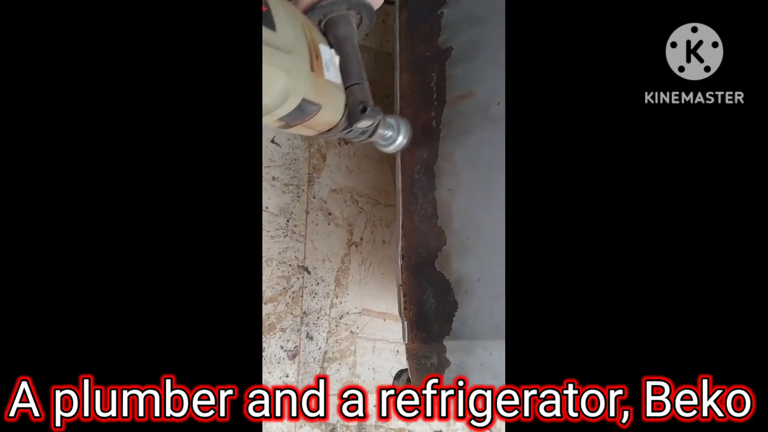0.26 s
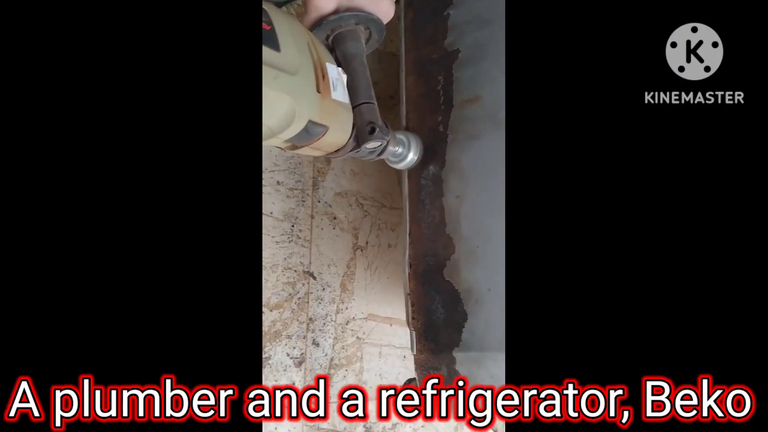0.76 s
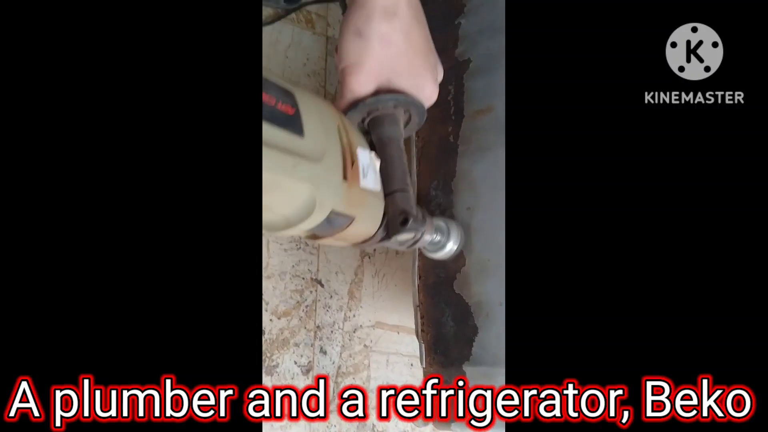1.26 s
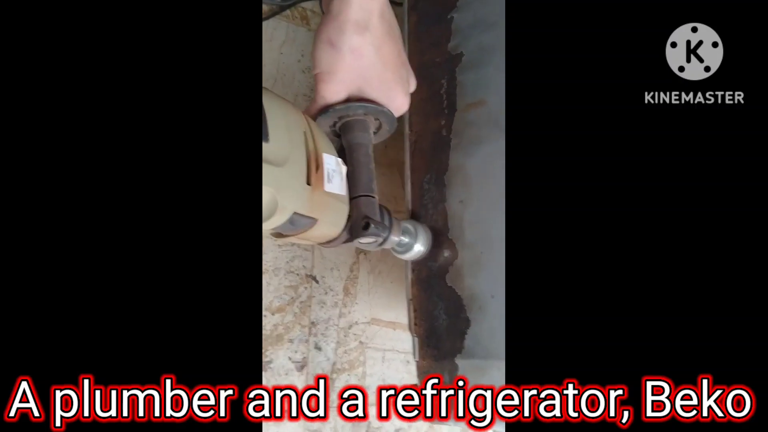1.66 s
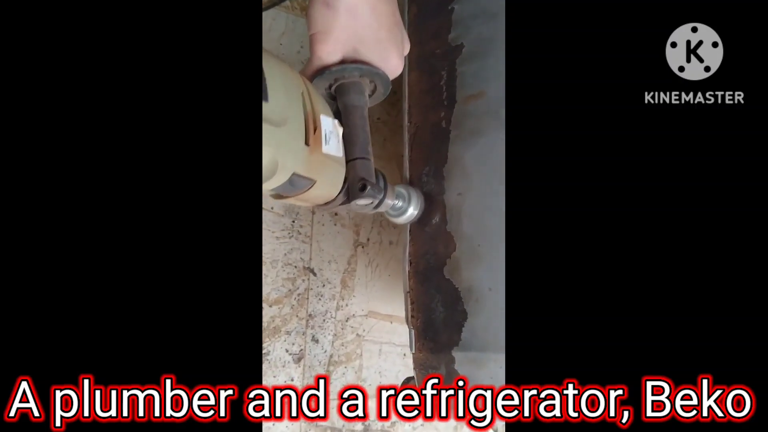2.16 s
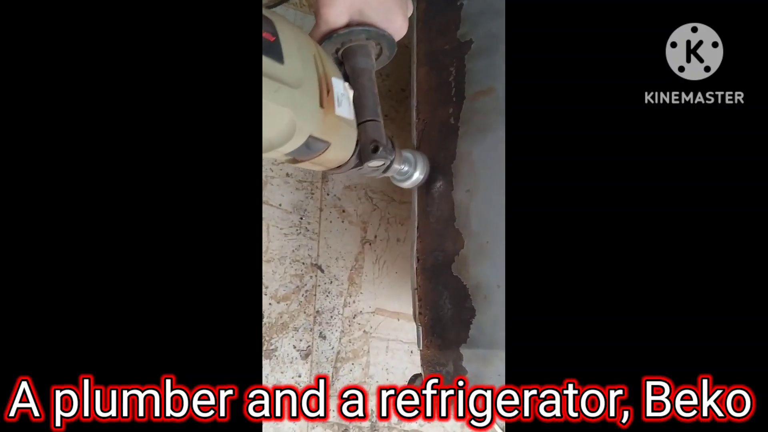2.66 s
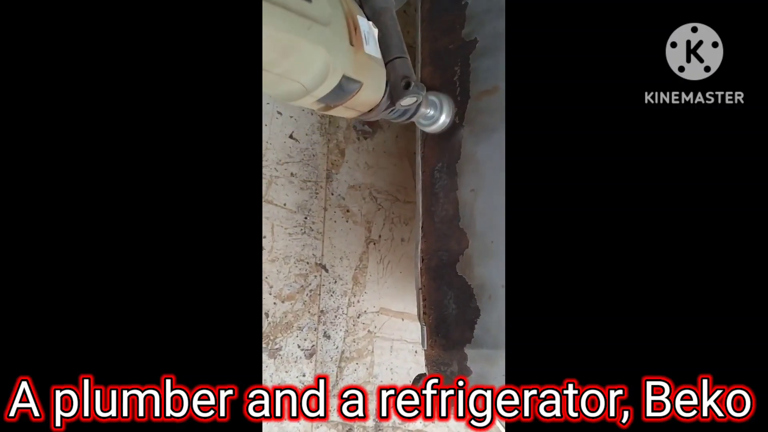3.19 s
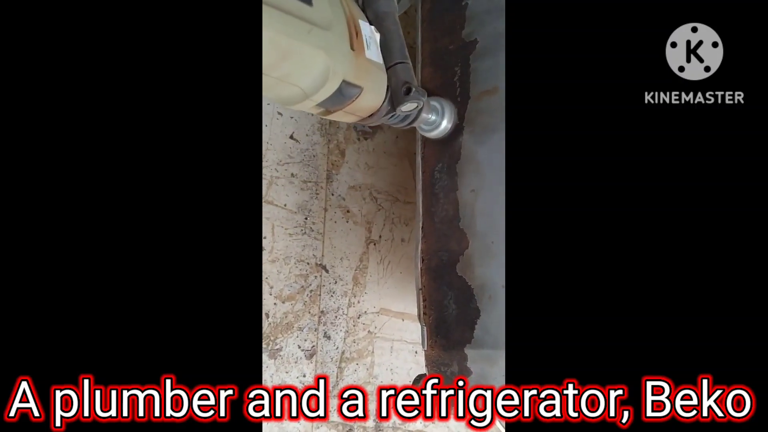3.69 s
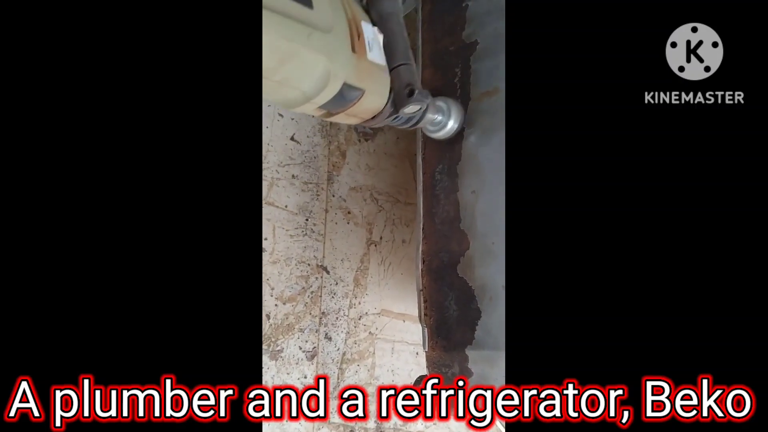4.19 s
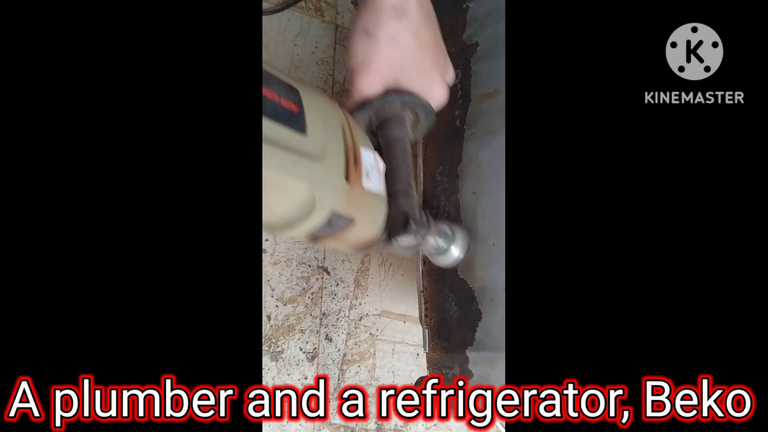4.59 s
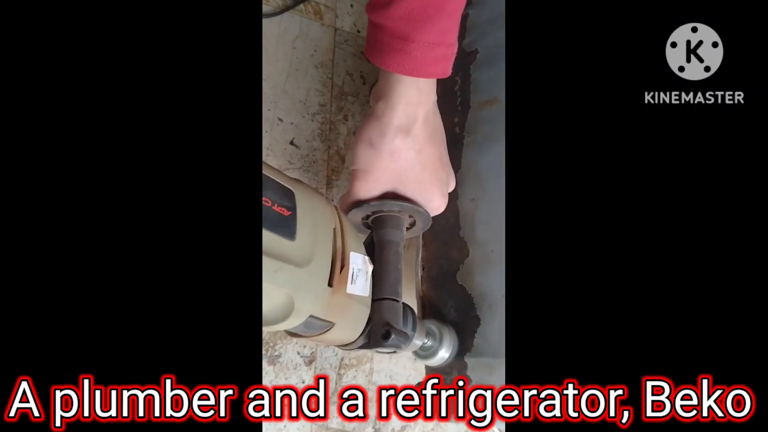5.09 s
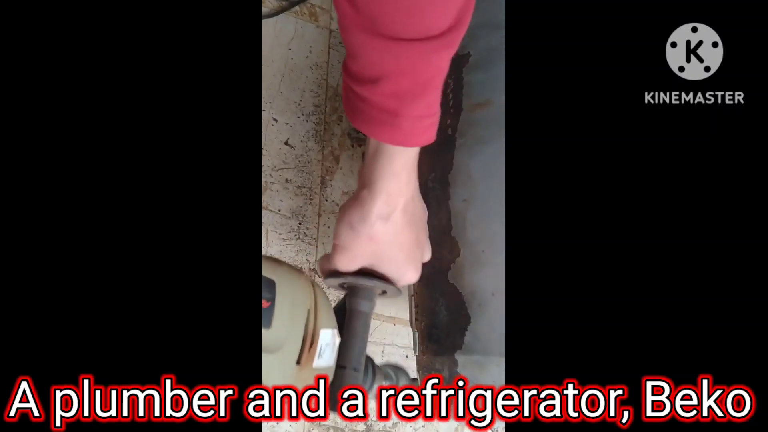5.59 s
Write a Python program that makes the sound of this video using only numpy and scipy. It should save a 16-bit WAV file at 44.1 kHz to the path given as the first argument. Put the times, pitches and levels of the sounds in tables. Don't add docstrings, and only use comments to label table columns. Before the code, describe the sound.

A corded drill whirs steadily up close, its wavering whine over a rough metallic scratching of a wire brush on rusty sheet metal.

```python
import sys
import numpy as np
from scipy import signal
from scipy.fft import rfft, irfft
from scipy.io import wavfile

SR = 44100
rng = np.random.default_rng(int(sys.argv[2]) if len(sys.argv) > 2 else 0)


def generate_wav(sig):
    pcm = np.round(np.clip(np.atleast_2d(sig).T, -1, 1) * 32767).astype(np.int16)
    wavfile.write(sys.argv[1], SR, pcm)


def magnitude_from_level(level_db):
    exponent = np.asarray(level_db, float) / 20
    return 10 ** exponent


N = 257984
MIC_CUT_HZ = 7965
WHINE_MEAN_DB = -23


def in_time(rows):
    seconds, *columns = np.transpose(rows)
    t = np.arange(N) / SR
    return [np.interp(t, seconds, column) for column in columns]


def rms_one(x):
    return x / np.sqrt(np.mean(x ** 2) + 1e-20)


def drift(rate_hz):
    every = 100
    pole = np.exp(-2 * np.pi * every * rate_hz / SR)
    noise = rng.standard_normal(N // every + 1002)
    slow = signal.lfilter([1], [1, -2 * pole, pole * pole], noise)[1000:]
    return np.interp(np.arange(N) / every, np.arange(len(slow)), rms_one(slow - slow.mean()))


def band(x, low_hz, high_hz):
    return signal.sosfilt(signal.butter(2, [low_hz, high_hz], "band", fs=SR, output="sos"), x)


def resonant(source, spectrum, low_hz, high_hz, count, shift_db, shift_rate, flicker_db):
    hz, db = np.transpose(spectrum)
    edges = np.geomspace(low_hz, high_hz, count + 1)
    out = np.zeros(N)
    for k in range(count):
        log_center = np.log(edges[k] * edges[k + 1]) / 2
        level_db = np.interp(log_center, np.log(hz), db)
        level_db = level_db + shift_db * drift(shift_rate) + flicker_db * drift(20)
        out += magnitude_from_level(level_db) * band(source[k % 2], edges[k], edges[k + 1])
    return rms_one(out)


# time [s], whine on the third multiple [dB].
WHINE = [(0, -19.5), (.3, -25.5), (.55, -19), (1.0, -23.5), (1.15, -20.5), (1.5, -24.5), (1.9, -24.5),
         (2.3, -22), (2.9, -23), (3.35, -19), (3.6, -21.5), (3.85, -17.5), (4.15, -22), (4.35, -18),
         (4.76, -22), (4.88, -26), (5.5, -30), (5.85, -28)]


def swing():
    return in_time(WHINE)[0] - WHINE_MEAN_DB


# time [s], level [dB].
BITE = [(0, 1.5), (.3, 0), (.75, .5), (1.5, 0), (2.0, 0), (2.5, -1), (2.9, 0.5), (3.25, 0), (3.5, .5),
        (4.25, 1), (4.75, -.5), (5.0, 0.2), (5.3, -0.5), (5.85, -1)]


def level(mean_db, whine_share, bite_share):
    return magnitude_from_level(mean_db + whine_share * swing() + bite_share * in_time(BITE)[0])


def workshop(x, count=10):
    t60_s, echo_db, first_return_s = .25, -11, .004
    age = np.arange(round(.3 * SR)) / SR
    place = np.linspace(0, count - 1, N)
    run_in = np.r_[x[-len(age):], x]
    out = x.copy()
    for k in range(count):
        tail = rng.standard_normal(len(age)) * magnitude_from_level(-60 * age / t60_s) * (age > first_return_s)
        tail *= magnitude_from_level(echo_db) / np.sqrt(np.sum(tail ** 2))
        echo = signal.fftconvolve(run_in, tail)[len(age):len(age) + N]
        out += np.cos(np.pi / 2 * np.clip(place - k, -1, 1)) * echo
    return out / np.sqrt(1 + magnitude_from_level(2 * echo_db))


# frequency [Hz], density [dB per Hz].
FIZZ = [(8000, 2), (9000, -0.5), (10000, -3.5), (11000, -4.5), (12500, -3), (13500, -1), (15600, -2)]


def microphone_fizz():
    noise = rng.standard_normal((2, N))
    fizz = resonant(noise, FIZZ, 7770, 16100, count=16, shift_db=-1.5, shift_rate=1.3, flicker_db=-0.2)
    return magnitude_from_level(-50.5) * workshop(fizz)


# middle [s], lowest frequency [Hz].
PUFFS = [(1.115, 4450), (1.138, 5000), (2.273, 5000), (3.9, 6200), (4.549, 5550), (4.688, 5300),
         (5.292, 4200), (5.292, 8000), (5.827, 4000), (1.115, 9200), (1.138, 13400), (1.553, 13700),
         (2.064, 10950), (2.18, 9560), (2.18, 12320), (2.296, 8870), (2.296, 11650), (3.9, 10250),
         (4.27, 9560), (4.549, 8870), (4.781, 13700), (5.617, 8870), (5.827, 9200)]


def noise_puffs():
    half, width_hz = 1024, 1400
    side = np.zeros(N + 2 * half)
    window = np.hanning(2 * half) ** 4
    hz = np.fft.rfftfreq(2 * half, 1 / SR)
    for middle_s, low_hz in PUFFS:
        spectrum = rfft(rng.standard_normal(2 * half))
        noise = irfft(spectrum * (hz > low_hz) * (hz < low_hz + width_hz))
        puff_db = -33 if low_hz < MIC_CUT_HZ else -58
        at = round(middle_s * SR) - half
        side[at:at + 2 * half] += magnitude_from_level(puff_db) * window * rms_one(noise)
    return side[:N] * [[1], [-1]]


# frequency [Hz], density [dB per Hz].
RUMBLE = [(15, -72), (25, -30.5), (43, -55), (97, -10.5), (144, -7.5), (253, -3.5), (386, -7), (444, -6),
          (503, -7.5), (857, -1.5), (1050, -1.5), (1360, -36), (2310, -120)]
# frequency [Hz], density [dB per Hz].
HISS = [(2410, -26.5), (4100, -9), (6360, -5), (7020, -4.5), (7400, -2), (7900, -10.5), (10300, -35),
        (17400, -120)]


def fan():
    air = rng.standard_normal((2, N))
    rumble = resonant(air, RUMBLE, 24.6, 1054, count=22, shift_db=-0.2, shift_rate=1.1, flicker_db=1.0)
    hiss = resonant(air, HISS, 4010, 8360, count=26, shift_db=1.1, shift_rate=0.84, flicker_db=0.86)
    rumble *= level(mean_db=-26.5, whine_share=-0.11, bite_share=.1)
    hiss *= level(mean_db=-29.5, whine_share=-0.11, bite_share=.1)
    return rumble + hiss


def bristles(per_s, spread_db):
    size_db = spread_db * np.minimum(rng.exponential(1, (2, N)), 4)
    strikes = magnitude_from_level(size_db) * rng.choice([-1, 1], (2, N))
    return strikes * (rng.random((2, N)) < per_s / SR)


# frequency [Hz], density [dB per Hz].
RING = [(590, -44), (1000, -27), (1070, -15), (1320, 1), (1380, -7), (1430, -2), (1520, -1.5), (1670, -6),
        (1900, -9.5), (2470, -39), (4180, -120)]
# frequency [Hz], density [dB per Hz].
SCRATCH = [(1900, 1.5), (2300, -3), (2800, -3.5), (3200, -8), (3600, -12), (3850, -12), (4000, -27),
           (4200, -30)]


def brush():
    tips = bristles(per_s=14000, spread_db=2.5)
    ring = resonant(tips, RING, 1003.5, 1896, count=12, shift_db=-0.7, shift_rate=2.3, flicker_db=0.53)
    scratch = resonant(tips, SCRATCH, 1879, 4210, count=20, shift_db=-0.55, shift_rate=0.6, flicker_db=0.72)
    ring = ring + (magnitude_from_level(.3 * swing()) - 1) * band(ring, 1160, 1470)
    ring *= level(mean_db=-17, whine_share=0.057, bite_share=1.2)
    scratch *= level(mean_db=-21.5, whine_share=-0.058, bite_share=0.88)
    return ring + scratch


# time [s], speed [turns per s].
SPEED = [(0, 445.5), (.4, 447.1), (.8, 450), (1.05, 449.6), (1.25, 451.4), (1.65, 456.5), (1.85, 455.2),
         (2.4, 445.6), (2.8, 441.6), (3.0, 441.7), (3.38, 446.6), (3.65, 446.2), (4.0, 447.4),
         (4.38, 451.1), (4.7, 451.2), (5.0, 452.3), (5.62, 452.5), (5.85, 454.8)]
# multiple of the turn, level at mean whine [dB],
# share of the whine's swing.
ORDERS = [(.55, -51, .5), (1, -38.5, -.2), (1.9, -44.5, 0), (2, -56, 0), (4, -41, .8), (5, -44, 1),
          (6, -46, .3), (8, -53, 1), (12, -57, 1), (24, -53, .6)]
# multiple of the turn, middle [s], spread [s], added level [dB].
SWELLS = [(1, 1.6, .17, -43), (1, 2.4, .15, -48), (1, 5.15, .45, -42), (2, .1, .15, -45), (2, .85, .3, -41),
          (2, 1.45, .25, -43), (2, 2.0, .25, -37), (2, 2.5, .2, -44), (2, 3.0, .18, -42),
          (2, 4.75, .2, -42), (2, 5.3, .33, -36.5), (6, 2.9, .5, -46), (16, 2.6, .4, -41),
          (24, 2.8, .35, -46), (8, 2.5, .2, -50), (4, 3.8, .5, -43), (12.5, 5.25, .2, -49),
          (17, 5.25, .25, -50), (15, .9, .4, -51), (15, 5.7, .2, -48), (16, 5.5, .3, -52)]


def motor():
    t = np.arange(N) / SR
    turns, = in_time(SPEED)
    angle = 2 * np.pi * np.cumsum(turns + .45 * drift(7)) / SR
    heights = {3: magnitude_from_level(WHINE_MEAN_DB + swing())}
    for multiple, level_db, share in ORDERS:
        heights[multiple] = magnitude_from_level(level_db + share * swing())
    for multiple, middle, spread, level_db in SWELLS:
        swell = magnitude_from_level(level_db) * np.exp(-.5 * ((t - middle) / spread) ** 2)
        heights[multiple] = heights.get(multiple, 0) + swell
    out = np.zeros(N)
    for multiple, height in heights.items():
        waver_db = 1.0 if multiple in (1, 2, 3) else 2.5
        start_phase = 2 * np.pi * rng.random()
        out += height * magnitude_from_level(waver_db * drift(12)) * np.sin(multiple * angle + start_phase)
    return np.sqrt(2) * out


def scene():
    return np.tile(motor() + workshop(brush() + fan()), (2, 1))


def top_cut(x):
    return signal.sosfilt(signal.butter(12, 15500, fs=SR, output="sos"), x)


def record(dry):
    rounded = np.tanh(dry)
    rounded = signal.sosfilt(signal.butter(2, 55, "high", fs=SR, output="sos"), rounded)
    voice_band = signal.sosfilt(signal.ellip(6, 1.5, 45, MIC_CUT_HZ, fs=SR, output="sos"), rounded)
    leak = magnitude_from_level(-24) * band(rounded, 10000, 11500)
    mix = voice_band + leak + microphone_fizz() + noise_puffs()
    return top_cut(mix)


dry = scene()
out = record(dry)
generate_wav(out)
```